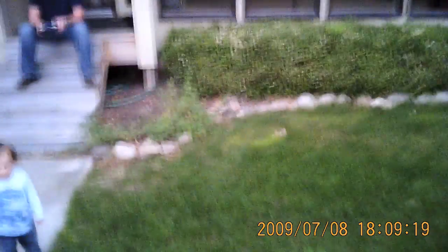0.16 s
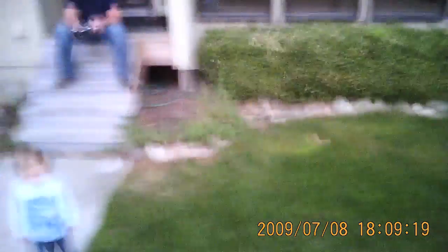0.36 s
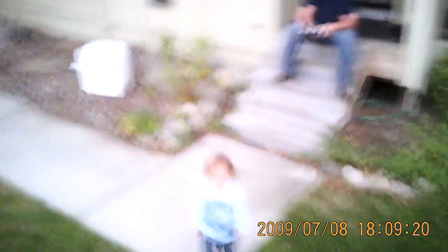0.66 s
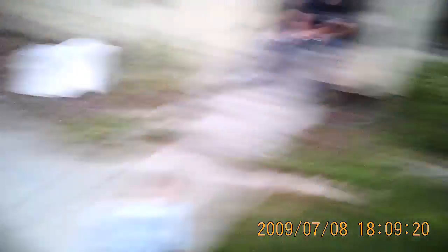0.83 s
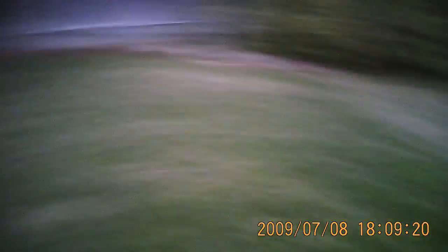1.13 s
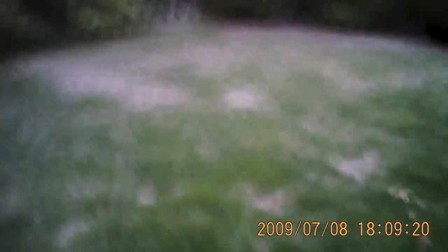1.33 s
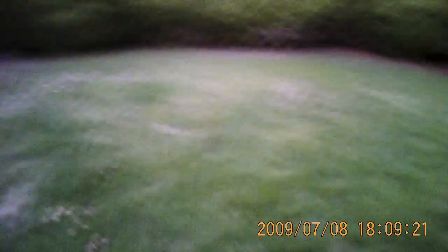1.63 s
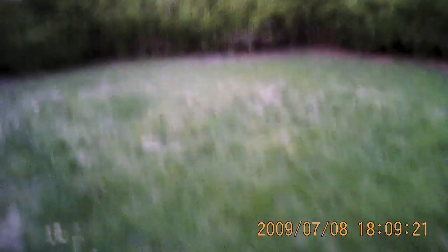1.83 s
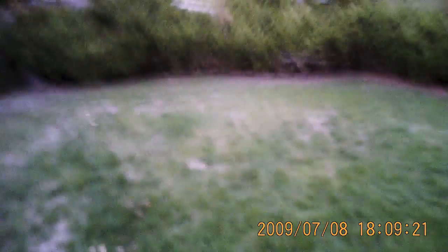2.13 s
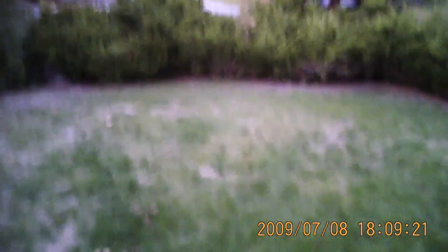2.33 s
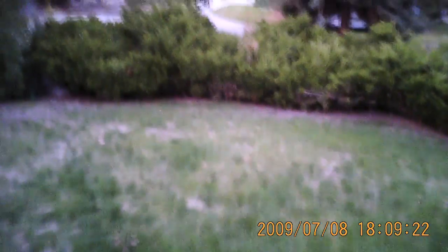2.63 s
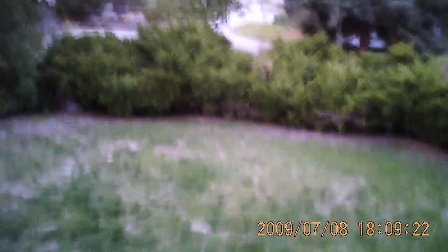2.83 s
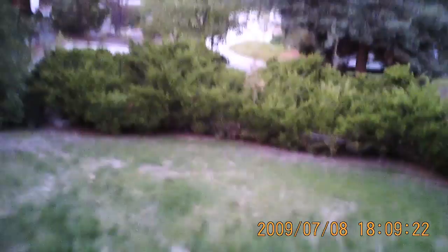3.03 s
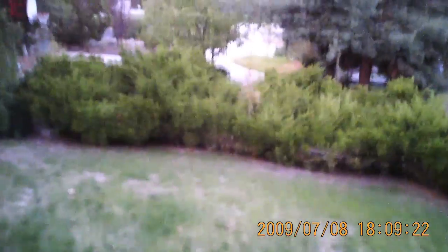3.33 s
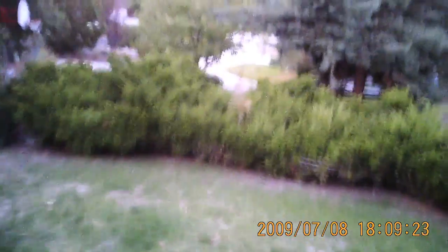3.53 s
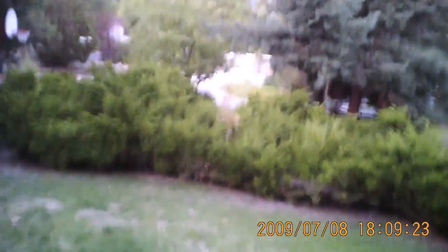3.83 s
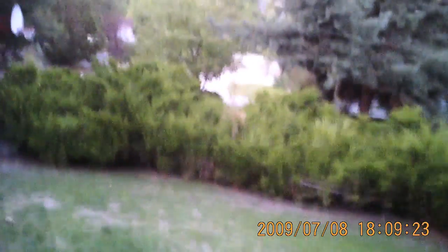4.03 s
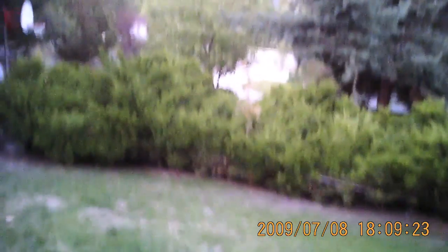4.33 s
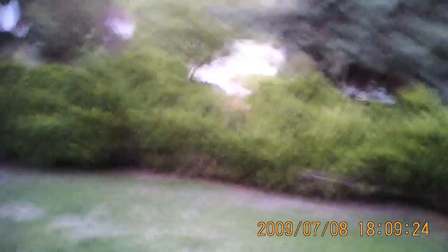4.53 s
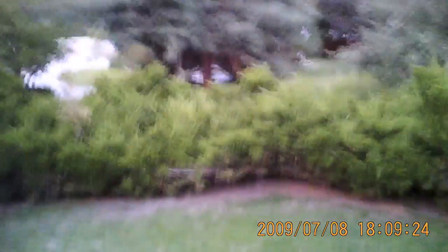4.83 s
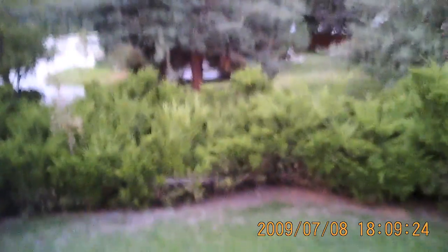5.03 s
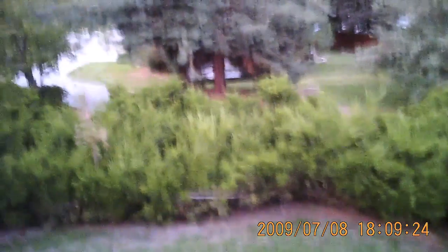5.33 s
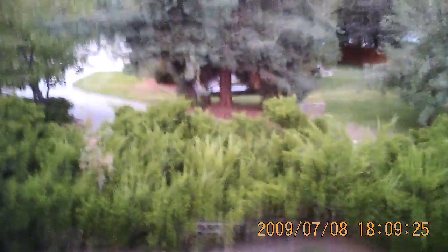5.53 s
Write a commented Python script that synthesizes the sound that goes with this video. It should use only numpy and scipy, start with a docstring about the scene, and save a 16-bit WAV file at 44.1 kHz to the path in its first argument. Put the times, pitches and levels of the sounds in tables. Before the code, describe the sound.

A small electric helicopter with two counter-rotating rotors flies outdoors over a lawn, close to the microphone, sounding continuously for about 5.7 seconds. Two high, nasal gear whines, around 2.5 and 2.7 kilohertz, stand apart at first, rough and fluttering. Near 1 second only the cleaner, higher one leaps up, then drops back. Both sag unevenly to their lowest pitch at about 2.6 seconds, where the low blade throb almost vanishes and the whine grows loud and distorted. A puff of rotor air bumps the microphone at 2.8 seconds. The pitch recovers a little, dips near 3.7, then climbs strongly past 4 seconds. More puffs come from 4.2 to 4.7 seconds, with the strongest blade chop. After 5 seconds the whines ease downward. Throughout, plastic gear teeth rasp and sizzle, motors hum and buzz, a thin steady electronic tone sings, and faint breeze lies behind.

```python
"""A small electric helicopter with two counter-rotating rotors flies over a lawn, close to the microphone.
At first two gear whines, one per motor and rotor, stand apart; near 1 s only the true-running one leaps up.
Both sink until about 2.6 s, where the blade throb nearly vanishes, then climb again past 4 s.
Rotor wash puffs at the microphone at 2.8 s and from 4.2 to 4.7 s, when the chop of the blades is strongest.
Throughout, tooth knocks rasp in the plastic frame, motors hum, and the loudest whine overloads the microphone."""
import sys
import numpy as np
from scipy import signal
from scipy.fft import rfft, irfft, next_fast_len
from scipy.io import wavfile
from scipy.ndimage import uniform_filter1d

SR = 44100
rng = np.random.default_rng(int(sys.argv[2]) if len(sys.argv) > 2 else 0)


def pcm_store(signal):
    """Save signal as 16-bit PCM."""
    levels = np.round(np.clip(np.atleast_2d(signal), -1, 1) * 32767)
    wavfile.write(sys.argv[1], SR, levels.astype(np.int16).T)


N = 250047
GEAR_TEETH, PINION_TEETH = 90, 10


def from_db(db):
    """Decibels to gain."""
    return 10 ** (np.asarray(db) / 20)


def rms_one(x):
    """Scale to unit power."""
    return x / np.sqrt(np.mean(x ** 2) + 1e-20)


def in_time(rows):
    """Columns of a curve at every sample."""
    seconds, *columns = np.transpose(rows)
    return [np.interp(np.arange(N) / SR, seconds, column) for column in columns]


def at_pitch(rows, hz):
    """Level of a whine at its present tooth rate."""
    return np.interp(hz, *np.transpose(rows))


def drift(rate_hz):
    """Slow chance of spread 1: noise through a two-pole lowpass, made at an eighth of the sample rate."""
    r = np.exp(-16 * np.pi * rate_hz / SR)
    noise = rng.standard_normal(N // 8 + 4002)
    slow = signal.lfilter([1], [1, -2 * r, r * r], noise)[4000:]   # skip the filter's start
    return np.interp(np.arange(N) / 8, np.arange(len(slow)), rms_one(slow))


def tone(cycles):
    """A sine of rms 1 on a running count of cycles."""
    return np.sqrt(2) * np.sin(2 * np.pi * cycles)


def blurred(cycles, width_hz):
    """A narrow band of noise that rides on a tone."""
    angle = 2 * np.pi * cycles
    return np.sin(angle) * drift(width_hz) + np.cos(angle) * drift(width_hz)


def colour(x, spectrum):
    """Give a sound a smooth spectrum; rms 1."""
    hz, db = np.transpose(spectrum)
    size = next_fast_len(N + SR // 10)
    bins = np.maximum(np.arange(size // 2 + 1) * SR / size, 1)
    gain = from_db(np.interp(np.log(bins), np.log(hz), db))
    return rms_one(irfft(rfft(x, size) * gain, size)[:N])


def resonance(x, hz, width_hz):
    """One two-pole resonance with gain 1 on top."""
    r = np.exp(-np.pi * width_hz / SR)
    feedback = [1, -2 * r * np.cos(2 * np.pi * hz / SR), r * r]
    return signal.lfilter(np.array([1, 0, -1]) * (1 - r * r) / 2, feedback, x)


# Colour of the rotor wash and breeze. Each row: frequency in Hz, relative level in dB per Hz.
WASH_COLOUR = [(15, 4), (35, 0.5), (90, 1.5), (190, -5.5), (280, -8.5), (400, -13.5), (700, -21.5),
               (1200, -22.5), (4000, -52)]


def breeze():
    """Steady air noise behind everything, with the colour of the wash."""
    return from_db(-40.5) * colour(rng.standard_normal(N), WASH_COLOUR)


# Puffs of rotor wash on the microphone. Each row: time of the peak in seconds, peak level in dB.
PUFFS = [(2.82, -34), (4.2, -30.5), (4.35, -27), (4.68, -28)]
# Colour of those puffs. Each row: frequency in Hz, relative level in dB per Hz.
PUFF_COLOUR = [(40, -8), (150, 6.5), (320, -10.5), (500, -10), (900, -27), (4000, -48), (12000, -65)]


def wash_puffs(slaps):
    """Wash reaches the microphone in short bell-shaped swells of noise, pulsed by the blade slaps."""
    t = np.arange(N) / SR
    swells = sum(from_db(db) * np.exp(-((t - peak_s) / 0.027) ** 2) for peak_s, db in PUFFS)
    return swells * colour(rng.standard_normal(N) * slaps, PUFF_COLOUR)


# Chop of the crossing blades. Each row: time in seconds, level in dB before a steady 2 dB cut.
CHOP_LEVEL = [(0.0, -33.5), (1.6, -34.5), (1.9, -37.5), (2.65, -36), (2.85, -34), (4.0, -34), (4.7, -29.5),
              (5.0, -33), (5.67, -35.5)]


def blade_chop(turns, slaps):
    """Blades of the two rotors cross four times a turn, chopping the air and pulsing the wash."""
    chop = tone(4 * turns + 0.016 * drift(6.7)) + from_db(-8) * blurred(6 * turns, 2.7)
    wash = colour(rng.standard_normal(N) * slaps, WASH_COLOUR)
    return from_db(in_time(CHOP_LEVEL)[0] - 2.0) * (chop + wash)


# Throb of the stronger rotor. Each row: time in seconds, level in dB.
THROB_LEVEL = [(0.0, -30.5), (1.3, -29.5), (2.3, -32.5), (2.55, -49), (2.8, -31), (4.0, -30), (5.67, -28.5)]
SECOND_ROTOR_DB, HEAD_START_TURNS = -6.5, .115


def blade_throb(first, second, turns):
    """Each rotor throbs twice a turn; the two beat at the difference of their blade rates."""
    blades = tone(2 * (first + HEAD_START_TURNS)) + from_db(SECOND_ROTOR_DB) * tone(2 * second)
    return from_db(in_time(THROB_LEVEL)[0]) * blades + from_db(-39.5) * blurred(turns, 0.57)


def rotors(first, second):
    """The blades throb and chop, and their slaps pulse the wash, all timed by the rotor turns."""
    turns = (first + second) / 2
    slaps = 1 + 0.57 * tone(4 * turns)
    return blade_throb(first, second, turns) + blade_chop(turns, slaps) + wash_puffs(slaps)


def speed_controller():
    """The speed controller sings at its switching rate and an octave above, drifting in level."""
    controller_hz = 1961
    switching = controller_hz * np.arange(N) / SR + 0.017 * drift(2.7)
    song = from_db(-40.5) * tone(switching) + from_db(-56.5) * tone(2 * switching)
    return song * from_db(2.2 * drift(17))


# Motor tones. Each row: multiple of the armature speed, then the level in dB at mean speed, before drift,
# on the smooth drive and on the wobbly drive.
MOTOR_TONES = [(1, -39.5, -45), (3, -59.5, -65.5), (4, -64, -56), (5, -60, -54.5), (7, -61, -59),
               (9, -43.5, -40.5)]


def motors(smooth, wobbly):
    """Unbalanced armatures hum and their brushes buzz, louder the faster they spin."""
    hum = 0
    for drive, teeth in enumerate((smooth, wobbly)):
        speed = np.gradient(teeth)
        effort = (speed / speed.mean()) ** 1.65
        for order, *levels in MOTOR_TONES:
            level = from_db(levels[drive] + 2.1 * drift(6.9))
            hum += effort * level * tone(order * teeth / PINION_TEETH + 0.04 * order * drift(4.3))
    return hum


def knocks(teeth, worn_db, pinion_db, chance_db):
    """One knock a tooth; uneven teeth repeat their pattern with each turn of gear and pinion."""
    at = np.flatnonzero(np.diff(np.floor(teeth)))
    tooth = teeth[at + 1].astype(int)
    uneven_db = worn_db * rng.standard_normal(GEAR_TEETH)[tooth % GEAR_TEETH]
    uneven_db += pinion_db * rng.standard_normal(PINION_TEETH)[tooth % PINION_TEETH]
    force = from_db(uneven_db + chance_db * rng.standard_normal(N)[tooth])
    clicks = np.zeros(N)
    clicks[at] = force - force.mean()   # the even part of the force is the whine
    return rms_one(clicks)


# Plastic frame resonances. Each row: frequency in Hz, width in Hz, relative level in dB.
FRAME = [(1441, 52, -2.5), (1888, 168, 6), (2311, 116, 1.5), (2475, 130, -0.5), (2850, 154, -4.5),
         (4040, 520, -12.5), (4540, 2100, -19)]
# Bright edge of the tooth knocks. Each row: frequency in Hz, relative level in dB per Hz.
TICK_COLOUR = [(500, -11), (1000, -4), (1300, 5.5), (3000, 1), (3600, -0.5), (4600, -1.5), (5800, -7.5),
               (6400, -6.5), (8100, -12.5), (8900, -19.5), (10800, -23.5), (12000, -24.5), (13000, -17),
               (15000, -41)]
# Overtones of the tooth rate. Each row: multiple of the rate, relative level in dB.
OVERTONES = [(2, -14), (3, -12), (4, -34.5), (5, -18)]
# Rasp of the teeth in the frame. Each row: time in seconds, level in dB before a steady 0.5 dB lift.
RASP_LEVEL = [(0.0, -30), (0.8, -29.5), (0.9, -27), (1.08, -27.5), (1.2, -28), (2.1, -30), (2.67, -29),
              (3.4, -29), (5.67, -30)]


def rasp(smooth, wobbly):
    """Knocks ring in the frame, swelling once a turn of the wobbling gear, very slightly with smooth blades."""
    # the smooth drive's two blades add a faint swell twice a turn
    load = 1 + 0.015 * tone(2 * smooth / GEAR_TEETH) + 0.088 * tone(wobbly / GEAR_TEETH)
    smooth_knocks = knocks(smooth, worn_db=3.1, pinion_db=0.35, chance_db=3.5)
    wobbly_knocks = knocks(wobbly, worn_db=3.5, pinion_db=0.35, chance_db=2.5)
    force = load * (smooth_knocks + wobbly_knocks)
    # neighbouring resonances have opposite signs
    ring = rms_one(sum((-1) ** k * from_db(db) * resonance(force, hz, width)
                       for k, (hz, width, db) in enumerate(FRAME)))
    ticks = colour(force + 1.57 * load * rng.standard_normal(N), TICK_COLOUR)
    # loose timing smears the higher overtones more; they leave through the same frame as the ticks
    overtones = sum(from_db(db) * (blurred(k * smooth, k * 45) + blurred(k * wobbly, k * 110))
                    for k, db in OVERTONES)
    sizzle = colour(overtones, TICK_COLOUR)
    treble = from_db(-6.5) * ticks + from_db(-14.5) * load * sizzle
    lowpass = signal.butter(10, 13400, fs=SR, output="sos")
    return from_db(in_time(RASP_LEVEL)[0] + 0.5) * (ring + signal.sosfilt(lowpass, treble))


# High metallic bands at multiples of the smooth tooth rate, alone or added to the wobbly rate. Each row:
# multiple of the smooth rate, multiple of the wobbly rate, width in Hz, greatest level in dB.
METALLIC_BANDS = [(2, 1, 55, -52), (4, 0, 230, -63), (4, 1, 240, -65.5)]
BANDS_FOLLOW = .55   # share of the smooth whine's swing in level


def metallic_edge(smooth, wobbly, smooth_db):
    """High noise bands ride on the tooth rates and swell with the true-running gear, up to a limit."""
    swell = from_db(BANDS_FOLLOW * np.minimum(smooth_db + 30.5, 0))
    return swell * sum(from_db(db) * blurred(j * smooth + k * wobbly, width)
                       for j, k, width, db in METALLIC_BANDS)


def whine(teeth, once, twice, swell, order, rough_db, rough_hz, octave_db, fifth_db):
    """Gear tone with fifth and octave; an out-of-round wheel hurries and holds back the teeth."""
    turns = teeth / GEAR_TEETH + 0.044 * drift(1.9)
    meshing = teeth + once * tone(turns) + twice * tone(2 * turns)   # once, twice: rms in teeth
    fifth = from_db(fifth_db) * tone(3 * meshing / 2)
    octave = from_db(octave_db) * tone(2 * meshing)
    clean = tone(meshing) + fifth + octave
    tightness = 1 + swell * tone(order * turns + 1 / 4)   # the mesh binds at the same spots of every turn
    roughness = from_db(rough_db) * blurred(teeth, rough_hz)   # play between the teeth
    return clean * tightness + roughness


# Whine of the true-running gear. Each row: tooth rate in Hz, level in dB before the changes of exposure.
SMOOTH_GEAR = [(2300, -27.5), (2390, -22.5), (2450, -26.5), (2520, -37), (2580, -43), (2660, -32),
               (2720, -25), (2770, -32), (2890, -29)]


def smooth_gear(smooth, smooth_db):
    """The true-running gear whines at its tooth rate, its mesh binding twice a turn."""
    return from_db(smooth_db) * whine(smooth, once=0.028, twice=0.037, swell=0.22, order=2,
                                      rough_db=-11.5, rough_hz=60.6, octave_db=-31.5, fifth_db=-44)


# Whine of the wobbling gear. Each row: tooth rate in Hz, level in dB before flutter and exposure.
WOBBLY_GEAR = [(2190, -17), (2290, -20), (2370, -25), (2430, -27.5), (2500, -33), (2570, -39.5)]
FLUTTER_DB, FLUTTER_WIDTH_HZ = 1.18, 8.1


def wobbly_gear(wobbly, wobbly_db):
    """The wobbling gear bites unevenly, about once a turn, so its whine flutters in level."""
    flutter_db = FLUTTER_DB * blurred(wobbly / GEAR_TEETH, FLUTTER_WIDTH_HZ)
    return from_db(wobbly_db + flutter_db) * whine(wobbly, once=0.1, twice=0.02, swell=0.054, order=1,
                                                   rough_db=-11.5, rough_hz=57, octave_db=-26.0, fifth_db=-25.5)


# How directly both whines reach the microphone. Each row: time in seconds, change of level in dB.
EXPOSURE = [(0.0, 0), (1.7, 0), (2.3, -2), (2.5, -.5), (2.85, 1.17), (3.3, -1), (3.8, 1.56), (4.1, 0.5),
            (5.67, -0.4)]


def exposed(gears):
    """Both whines come through more or less directly as the helicopter moves about."""
    return from_db(in_time(EXPOSURE)[0]) * gears


def spin(speed, unrest):
    """Tooth rate of a drive at every sample: the rotor's inertia rounds each change of throttle."""
    inertia_s = .11
    hz = uniform_filter1d(in_time(speed)[0], size=int(inertia_s * SR), mode="nearest")
    return hz * (1 + unrest)


# Speed of the true-running gear. Each row: time in seconds, tooth rate in Hz before rounding and unrest.
SMOOTH_SPEED = [(0.0, 2695), (0.34, 2687), (0.41, 2737), (0.7, 2532), (0.82, 2628), (1.04, 2950),
                (1.17, 2660), (1.42, 2665), (1.52, 2510), (1.6, 2572), (2.02, 2552), (2.21, 2491),
                (2.59, 2250), (2.91, 2403), (3.36, 2444), (3.6, 2323), (3.79, 2393), (4.09, 2675),
                (5.18, 2685), (5.34, 2496), (5.67, 2528)]
# Speed of the wobbling gear. Each row: time in seconds, tooth rate in Hz before rounding and unrest.
WOBBLY_SPEED = [(0.0, 2503), (0.3, 2523), (0.7, 2403), (0.81, 2486), (1.27, 2479), (1.37, 2380),
                (1.54, 2547), (1.69, 2340), (2.17, 2386), (2.65, 2182), (2.97, 2290), (3.32, 2310),
                (3.71, 2212), (4.11, 2458), (4.57, 2568), (5.06, 2511), (5.49, 2398), (5.67, 2421)]


def scene():
    """Both drives and their rotors, heard from close by."""
    smooth_hz = spin(SMOOTH_SPEED, .0006 * drift(8))
    wobbly_hz = spin(WOBBLY_SPEED, .0017 * drift(11))
    smooth, wobbly = np.cumsum(smooth_hz) / SR, np.cumsum(wobbly_hz) / SR   # teeth gone by
    smooth_db, wobbly_db = at_pitch(SMOOTH_GEAR, smooth_hz), at_pitch(WOBBLY_GEAR, wobbly_hz)
    air = breeze() + rotors(smooth / GEAR_TEETH, wobbly / GEAR_TEETH)
    drives = motors(smooth, wobbly) + speed_controller()
    frame = rasp(smooth, wobbly)
    edge = metallic_edge(smooth, wobbly, smooth_db)
    gears = exposed(smooth_gear(smooth, smooth_db) + wobbly_gear(wobbly, wobbly_db))
    return (air + drives + frame + edge + gears)[None]


def record(dry):
    """The microphone bends the wave a little lopsided and its amplifier clips hard; the top is cut."""
    top, bend, cutoff_hz = .248, .35, 14800
    bent = dry - bend * (dry ** 2 - np.mean(dry ** 2))
    clipped = np.clip(bent, -top, top)
    return signal.sosfilt(signal.ellip(10, .2, 80, cutoff_hz, fs=SR, output="sos"), clipped)


dry = scene()
out = record(dry)
pcm_store(out)
```